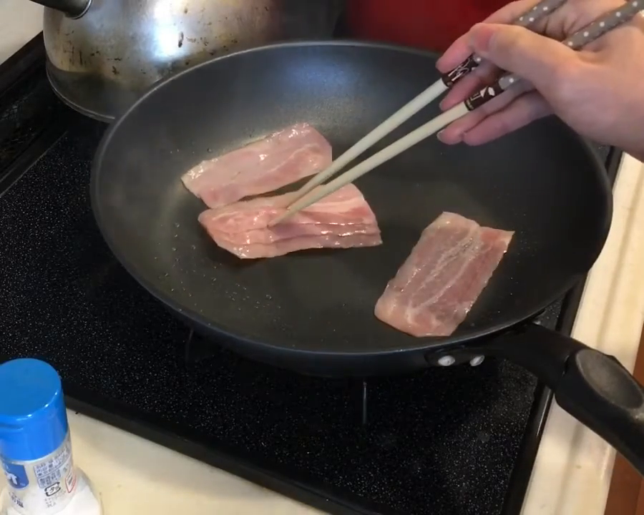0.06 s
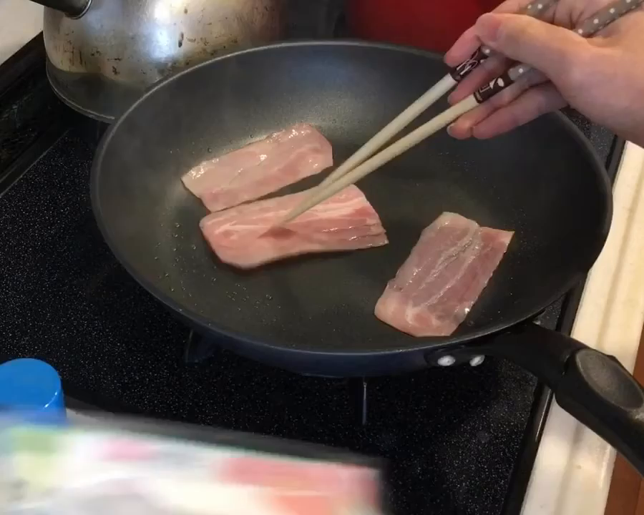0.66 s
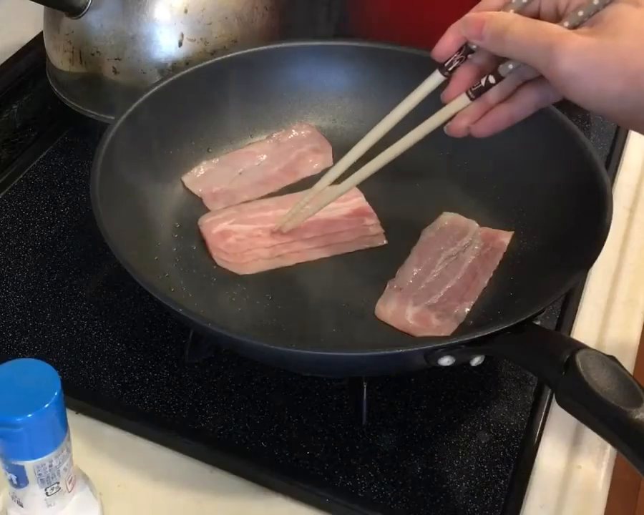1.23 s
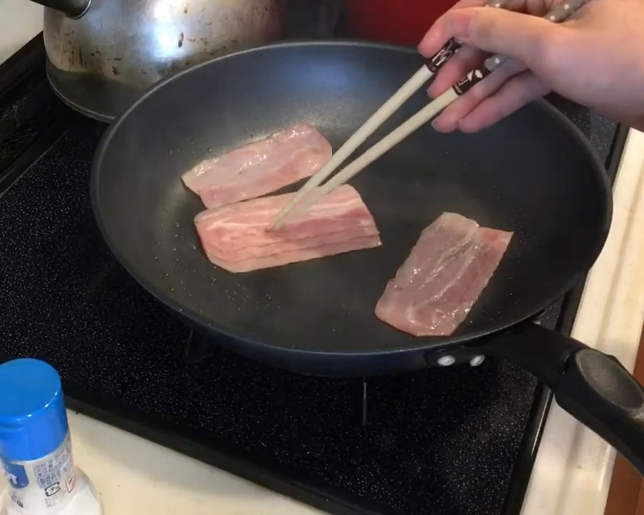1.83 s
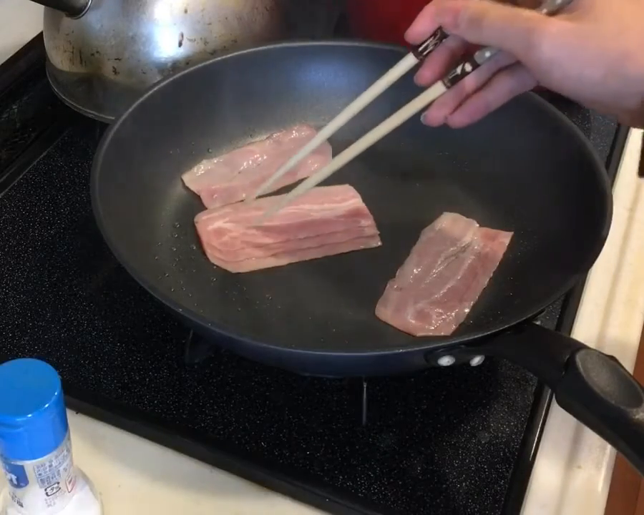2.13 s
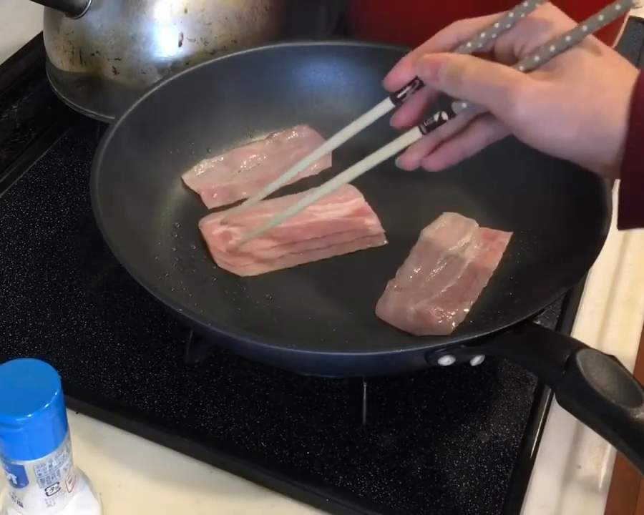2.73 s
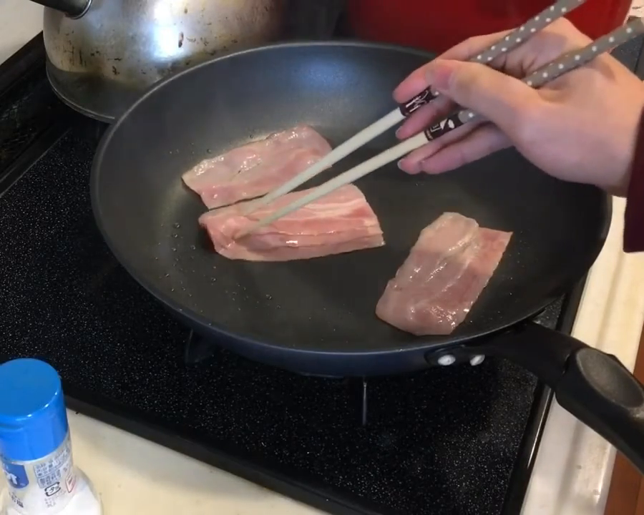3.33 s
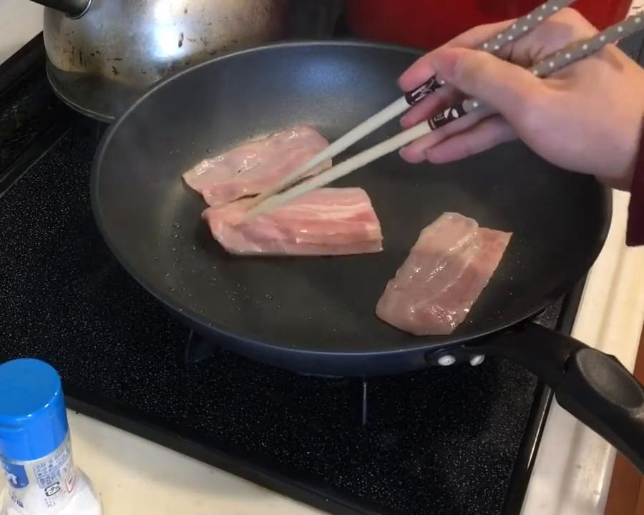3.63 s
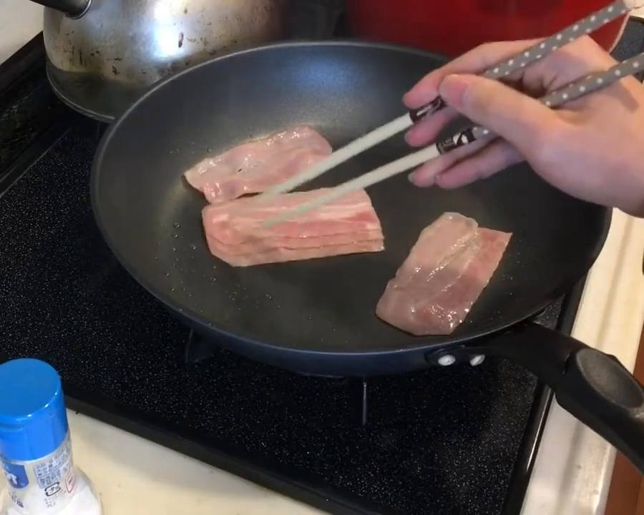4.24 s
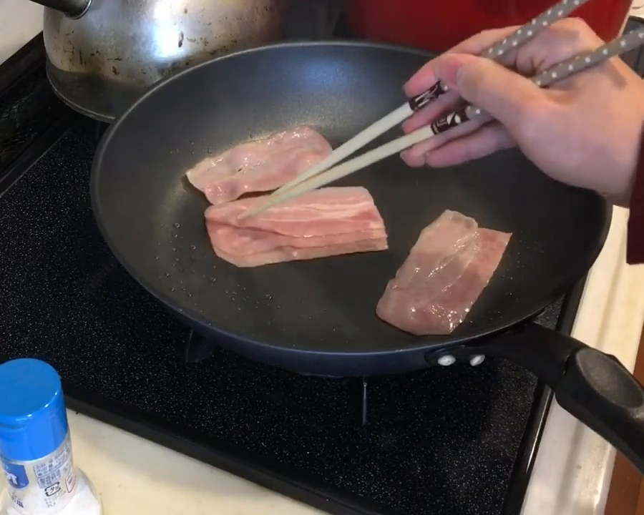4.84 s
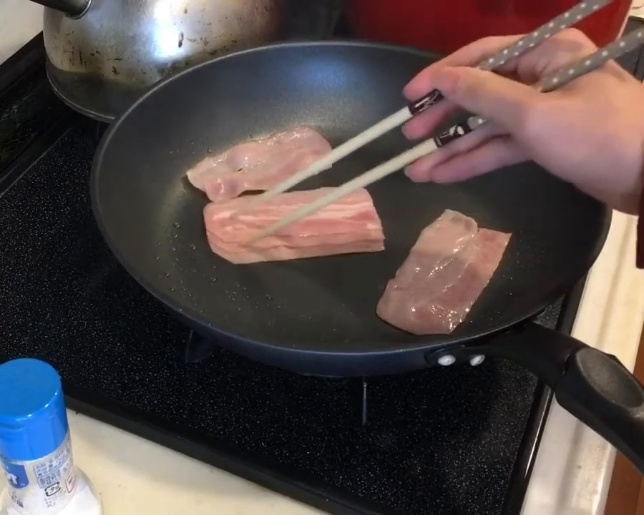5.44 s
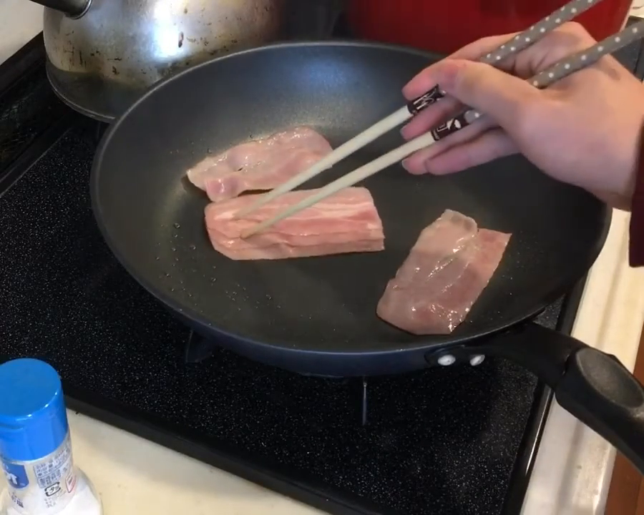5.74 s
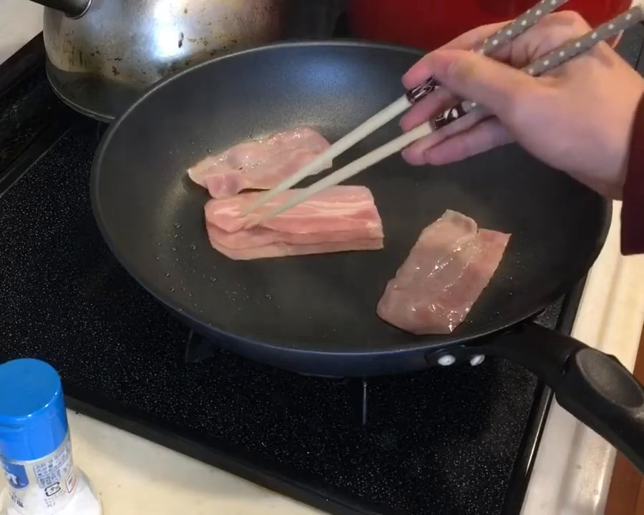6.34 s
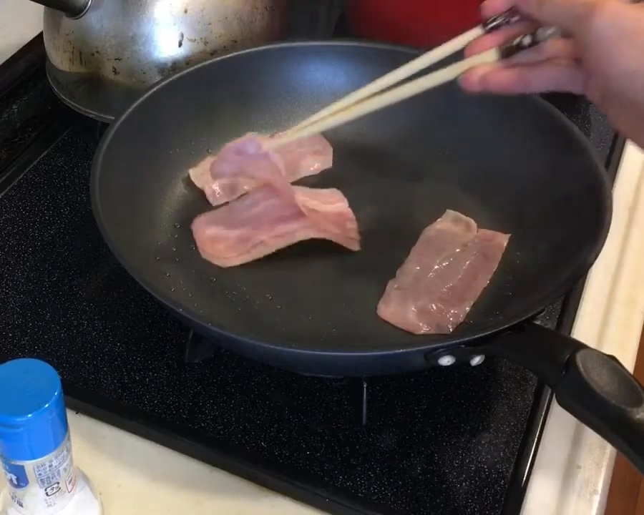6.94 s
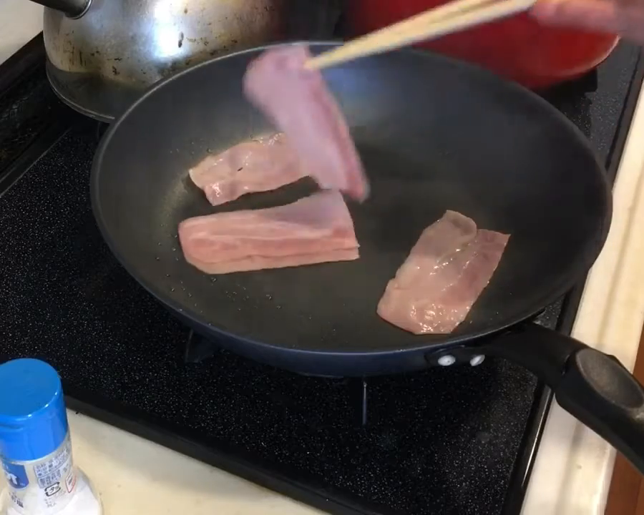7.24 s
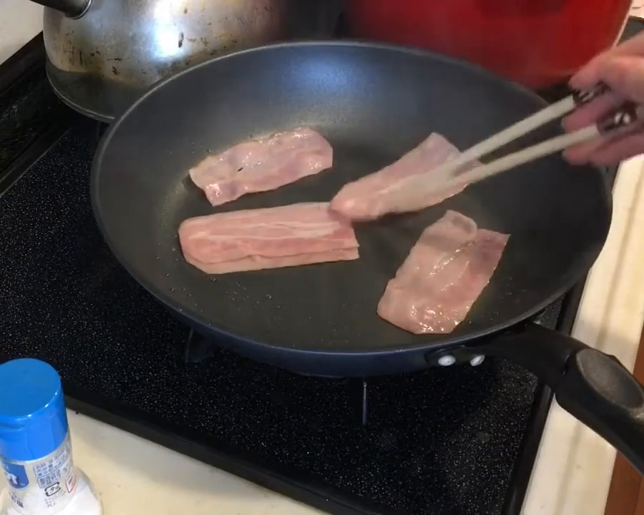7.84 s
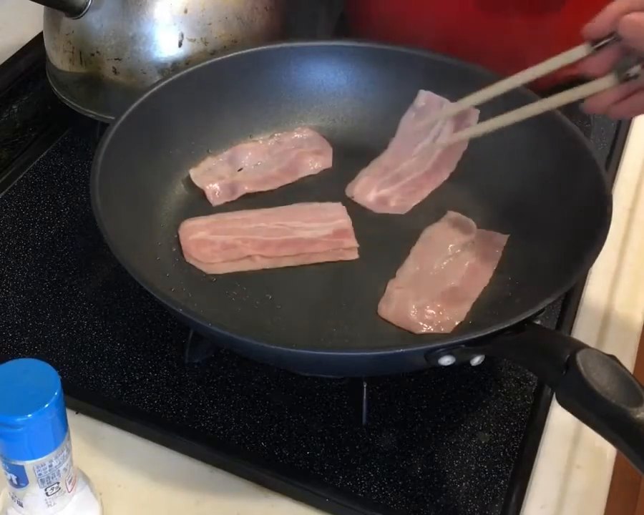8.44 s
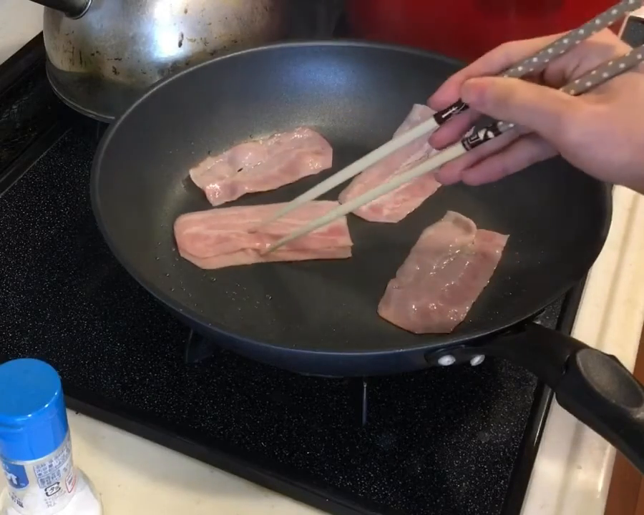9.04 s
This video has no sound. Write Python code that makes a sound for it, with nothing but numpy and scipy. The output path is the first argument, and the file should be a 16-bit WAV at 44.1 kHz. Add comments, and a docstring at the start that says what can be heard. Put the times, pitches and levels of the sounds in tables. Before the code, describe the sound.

Bacon sizzles and crackles in a hot oiled pan, with sharp pops of spitting fat and a few soft chopstick scrapes and bumps.

```python
"""Bacon in a hot oiled pan, close to a mono microphone in a small kitchen. From the start, tiny steam
bubbles fizz and larger ones crackle, ringing the pan over a low room hum. Within the first second, drops
of water begin to pop and spray fat. Chopsticks then move the strips, with soft bumps near 1 and 1.7 s
and a few later scrapes. From about 5 s the pops come thicker, and near 7.8 s a scrape ends in one dull
thump while the frying carries on."""
import sys
import numpy as np
from scipy import signal
from scipy.fft import rfft, irfft, next_fast_len
from scipy.io import wavfile
from scipy.ndimage import map_coordinates

SR = 44100
rng = np.random.default_rng(int(sys.argv[2]) if len(sys.argv) > 2 else 0)


def log_audio(samples):
    """Write samples as a 16-bit WAV file to the path given in sys.argv[1]."""
    # one column per channel
    frames = np.atleast_2d(samples).T
    # limit to full scale, then quantise
    limited = np.clip(frames, -1, 1)
    pcm = np.round(limited * 32767).astype(np.int16)
    wavfile.write(sys.argv[1], SR, pcm)


N = 400869

# How hard the bacon fries. Each row: time in seconds, frying and bubbling strength in relative dB.
HEAT_CURVES = [(0, -33.5, -35.3), (0.75, -34.5, -35.5), (1.4, -34.5, -33.5), (2.05, -35, -35),
               (2.45, -35.5, -34), (3.1, -36, -33), (3.35, -34.5, -33.5), (3.62, -34.5, -33.5),
               (3.76, -35.5, -36.5), (5.35, -36.5, -37), (6.45, -36, -36.5), (6.75, -35, -34.5),
               (7.05, -36, -38), (7.45, -35, -35.8), (7.65, -34, -34.2), (8.3, -34, -35.5),
               (9.09, -34.5, -37.5)]
# Resonances of the pan. Each row: frequency in Hz, width in Hz, lift in dB.
PAN_MODES = [(432, 44, 8), (529, 13, 6), (838, 56, 8.5), (933, 78, 6), (1248, 183, 8), (1479, 25, 5.5),
             (1868, 190, 7.5), (2124, 123, 4.5), (2403, 190, 4.5), (2770, 72, 3.5), (3170, 106, 3.5),
             (3428, 230, 6), (3620, 140, 1.5), (3970, 360, 2.5), (4460, 99, 4.5)]
# Tone colours as heard at the microphone. Each row: frequency in Hz, relative level in dB.
MIST_SPECTRUM = [(3000, -25), (8000, -18), (10400, -6), (11200, 0.5), (13000, 1), (15700, -4)]  # the finest spatter
FIZZ_SPECTRUM = [(300, -30.5), (1500, -12), (4000, -8), (7500, -2), (8600, 0.5), (9900, 0.5), (10450, -6.5),
                 (11100, -2.5), (15700, -22.5)]
BUBBLING_SPECTRUM = [(1500, -21.5), (4000, -10.5), (4900, -5), (5250, 2.5), (5600, 4.5), (6300, 3.5),
                     (7100, -0.5), (7800, -6), (11000, -25)]
SIMMER_SPECTRUM = [(100, -23.5), (250, -6.5), (600, -12), (730, -16), (820, -12), (1200, -4.5), (2300, -2),
                   (2950, -1.5), (3300, 1.5), (4400, 2.5), (5500, -1), (9000, -38)]
BOWL_SPECTRUM = [(300, -4), (1500, -1), (2200, -0.5), (4000, -0.5), (4800, -0.5), (5400, 5), (6700, 5),
                 (7800, 3), (15000, -1)]  # how the shallow pan passes a burst on
HUM_SPECTRUM = [(20, -27), (40, -7), (55, -2), (73, 5), (95, 0), (130, -1.5), (200, -11), (320, -14),
                (700, -11.5), (2000, -60)]
SPRAY_SPECTRUM = [(300, -7), (730, -14.5), (1200, 0), (2900, -3.5), (3500, -0.5), (4800, -1), (5600, 3.5),
                  (6800, 3.5), (8000, 0), (10400, -2), (11500, 2.5), (15500, -20)]
KNOCK_SPECTRUM = [(50, -42), (150, -4), (330, 3), (600, -2), (730, -6), (1000, -0.5), (1400, 2),
                  (2500, -47), (6000, -33)]
# The kitchen's reverberation. Each row: frequency in Hz, seconds to fade by 60 dB.
ROOM_DECAY = [(150, 0.26), (1500, 0.19), (6000, 0.14), (14000, 0.2)]
# The loudest drops bursting in the fat. Each row: start in seconds, energy in dB before the pan colours
# it, pitch in Hz, share thrown as spray from 0 to 1, knock on the pan in dB relative to the pop.
LOUD_DROPS = [(0.7534, -3.5, 6000, 0.9, -16), (0.978, -3.5, 6000, .7, -10), (2.2288, -5, 5200, 0.5, -31),
              (2.5144, -6, 6500, 0.95, -9.5), (2.5651, -12.5, 1570, .4, -8),
              (2.8423, -9.5, 2000, 0.5, -1.5), (3.095, 0, 3730, 0.8, -9.5), (3.242, -5, 7000, 1, -26),
              (3.359, -2.5, 4800, 0.86, -11), (3.6747, 2.5, 3600, 0.97, -14), (4.007, -6, 6200, 0.7, -11),
              (4.7901, -3, 5600, 0.63, -22), (5.0063, -1.5, 4100, 0.56, -15.5),
              (5.1035, -3.5, 2660, 0.66, -15), (5.36, -0.5, 6850, 0.85, -22), (5.4569, -6.5, 6500, 1, -11),
              (5.4731, -3.5, 5900, .3, -11), (5.5411, -3.5, 4500, 0, -23), (5.622, -5.5, 2090, 0.4, -10),
              (5.681, -4, 5350, .4, -17), (5.7282, 1, 4500, 0.5, -36), (6.052, -6.5, 3300, 0.65, -11),
              (6.147, -3, 7500, .75, -19), (6.2465, -8, 5800, 0, -18), (6.2932, 0, 4670, 0.38, -14),
              (6.3486, -2.5, 5330, 0.56, -17), (6.5869, 0.5, 2430, .8, -14), (6.7138, -1, 7100, 0.97, -21),
              (6.7832, -2, 4220, 0.74, -12), (6.869, -2, 6640, 0, -39), (7.0252, -5, 3800, 0.7, -11),
              (7.0511, -2.5, 3900, 0.6, -17), (7.1593, -2, 4400, .9, -10), (7.278, 3.5, 4000, 0.5, -12.5),
              (7.4352, -4.5, 4970, .7, -24), (7.529, -1.5, 6600, 0.26, -32), (7.9615, -3, 6200, .5, -17),
              (8.1001, -4, 6300, 0.1, -30), (8.2421, -6.5, 3300, 0.7, -9), (8.609, -3.5, 5700, 0.35, -32),
              (8.7967, -1, 7100, 0.6, -31), (8.8248, 0.5, 3600, 0.91, -17), (8.98, -6.5, 1800, 0.5, -5.5)]
# Chopsticks tapping and scraping. Each row: start in seconds, energy in dB, centre in Hz,
# width in octaves, seconds to fade by 60 dB.
CHOPSTICK_STROKES = [(.9775, -13.5, 300, 1.2, 0.015), (1.711, -14, 850, 0.34, .09),
                     (1.714, -12.5, 200, 0.48, 0.17), (1.725, -11, 1600, .5, 0.064),
                     (3.095, -7.5, 1380, 0.57, 0.045), (3.675, -2, 1210, 0.52, 0.11),
                     (3.676, -7.5, 400, 0.8, 0.077), (6.7818, -11, 600, 1.3, 0.03),
                     (7.7418, -1.5, 1930, 0.12, 0.031), (7.757, -1, 3300, .25, 0.033),
                     (7.756, -4, 680, 0.74, 0.026), (7.929, -19, 450, 0.57, 0.02)]
# Dull bumps on pan and stove. Each row: start in seconds, level in dB before the onset is softened,
# pitch in Hz, seconds to fade by 60 dB.
STOVE_BUMPS = [(0.979, -42, 130, 0.046), (1.728, -39, 217, .1), (1.768, -37.5, 90, 0.082),
               (7.755, -9.5, 345, 0.012), (7.757, -18.5, 66.6, 0.047), (7.7582, -13.5, 138, 0.02)]


def amp(db):
    """Decibels to gain."""
    return 10 ** (np.asarray(db) / 20)


def unit_rms(x):
    """Scaled to rms 1."""
    return x / np.sqrt(np.mean(x ** 2) + 1e-20)


def unit_energy(x):
    """Scaled to energy 1."""
    return x / np.sqrt(np.sum(x ** 2) + 1e-20)


def along(points, hz):
    """Rows of frequency and value, read on a log frequency axis."""
    freqs, values = np.transpose(points)
    return np.interp(np.log(hz + 1), np.log(freqs + 1), values)


def wobble(rate):
    """A smooth random curve, rate knots a second."""
    return map_coordinates(rng.standard_normal(int(N * rate / SR) + 4), [np.arange(N) * rate / SR])


def add(track, start_s, sound):
    """Mix a short sound into a track."""
    part = track[max(round(start_s * SR), 0):][:len(sound)]
    part += sound[:len(part)]


def minimum_phase(db):
    """The complex spectrum of a causal filter with these gains."""
    cepstrum = irfft(np.log(amp(db)))[:len(db) - 1]
    cepstrum[1:] *= 2
    return np.exp(rfft(cepstrum, 2 * len(cepstrum)))


def colour(x, spectrum, modes=(), size=8192):
    """A sound filtered by a broad spectrum that is lifted at its resonances."""
    hz = np.fft.rfftfreq(size, 1 / SR)
    lift_db = sum(lift / (1 + (2 * (hz - centre) / width) ** 2) for centre, width, lift in modes)
    ring = irfft(minimum_phase(along(spectrum, hz) + lift_db))[:size // 2]
    return signal.fftconvolve(x, unit_energy(ring))[:len(x)]


def around(x, hz, octaves, depth_db):
    """A short sound with only the range around one pitch left strong; energy 1."""
    size = 2 * len(x)
    away = np.log2((np.fft.rfftfreq(size, 1 / SR) + 1) / hz) / octaves
    cut_db = depth_db * away ** 2 / (away ** 2 + depth_db / np.pi)
    return unit_energy(irfft(rfft(x, size) * minimum_phase(-cut_db))[:len(x)])


def ticks(rate, spread_db, size):
    """Random tiny clicks, rate a second, with log-normal sizes."""
    happens = rng.random(size) < rate / SR
    polarity = np.sign(rng.standard_normal(size))
    return happens * polarity * amp(spread_db * np.minimum(rng.standard_normal(size), np.e))


def follow(curve_db, level_db, swing):
    """Gain of a layer that lies at level_db and swings with a control curve."""
    return amp(level_db + swing * (curve_db - curve_db.mean()))


def boil(spectrum, rate, spread_db, flutter_db, surge_db):
    """A swarm of steam bubbles comes in flurries and rings the pan; rms 1."""
    flurries = amp(flutter_db * wobble(130) + surge_db * wobble(22))
    return unit_rms(colour(ticks(rate, spread_db, size=N) * flurries, spectrum, PAN_MODES))


def sizzle():
    """Four sizes of steam bubble boil off under the strips; the bubbling follows its own curve."""
    times, *curves = np.transpose(HEAT_CURVES)
    frying_db, bubbling_db = [np.interp(np.arange(N) / SR, times, curve) for curve in curves]
    mist = boil(MIST_SPECTRUM, rate=11000, spread_db=4, flutter_db=1.1, surge_db=0.93)
    fizz = boil(FIZZ_SPECTRUM, rate=11000, spread_db=5, flutter_db=0.7, surge_db=1)
    bubbling = boil(BUBBLING_SPECTRUM, rate=6000, spread_db=4.5, flutter_db=1.5, surge_db=1.2)
    simmer = boil(SIMMER_SPECTRUM, rate=5000, spread_db=4, flutter_db=1.2, surge_db=0.86)
    return (mist * follow(frying_db, level_db=-38, swing=0.84)
            + fizz * follow(frying_db, level_db=-36, swing=1.33)
            + bubbling * follow(bubbling_db, level_db=-36.5, swing=1.47)
            + simmer * follow(frying_db, level_db=-39, swing=0.6))


def bubble_burst(hz, cycles, t):
    """A bursting bubble: its cavity's ring swells for the given cycles and quickly dies."""
    age = t * hz / cycles
    return unit_energy(age ** 2 * np.exp(-2 * age) * np.sin(2 * np.pi * (hz * t + rng.random())))


def crackle(level_db, growth_db, spread_db, pitch_hz, scatter, count=520):
    """Single bubbles snap dryly in the pan, each at its own pitch, harder as the bacon heats."""
    snaps, t = np.zeros(N), np.arange(SR // 200) / SR
    for progress, size, pitch in zip(rng.random(count), *rng.standard_normal((2, count))):
        hz = np.clip(pitch_hz * np.exp(scatter * pitch), 1500, 14000)
        db = level_db + growth_db * progress + spread_db * min(size, 2)
        add(snaps, progress * N / SR, amp(db) * bubble_burst(hz, cycles=0.5, t=t))
    return colour(snaps, BOWL_SPECTRUM, PAN_MODES)


def room_hum(level_db):
    """The kitchen's steady low rumble, behind the pan."""
    return amp(level_db) * unit_rms(colour(rng.standard_normal(N), HUM_SPECTRUM))


def kitchen_reverb(x):
    """Hob and walls answer 4 ms behind the direct sound; the lows linger longest."""
    hz, t, noise = signal.stft(rng.standard_normal(SR // 3), SR, nperseg=256)
    fade = amp(-60 * t / along(ROOM_DECAY, hz)[:, None])
    _, tail = signal.istft(noise * fade, SR, nperseg=256)
    delayed = np.pad(tail, (SR // 250, 0))
    return signal.fftconvolve(x, unit_energy(delayed))[:len(x)]


def water_pops(drops, cycles, snap_db, spray_t60, knock_t60):
    """A drop flashes to steam: its cavity rings, droplets snap off and patter, the metal is knocked."""
    bursts, sprays, knocks = np.zeros((3, N))
    t = np.arange(SR // 10) / SR
    for start, db, hz, share, knock_db in drops:
        snap = amp(snap_db) * unit_energy(rng.standard_normal(len(t)) * amp(-60 * t / 0.0015))
        cavity = bubble_burst(hz, cycles, t)
        add(bursts, start - 0.0001, amp(db) * (np.sqrt(1 - share) * cavity + np.sqrt(share) * snap))
        patter = ticks(rate=9000, spread_db=1.9, size=len(t)) * amp(-60 * t / spray_t60)
        # The less a drop sprays, the closer its droplets keep to its pitch.
        spray = around(patter, hz, octaves=0.6, depth_db=2.5 + 15 * (1 - share))
        add(sprays, start + 0.0006, amp(db) * np.sqrt(share) * spray)
        knock = unit_energy(rng.standard_normal(len(t)) * amp(-60 * t / knock_t60))
        add(knocks, start, amp(db + knock_db) * knock)
    return (colour(bursts, BOWL_SPECTRUM, PAN_MODES)
            + colour(sprays, SPRAY_SPECTRUM, PAN_MODES)
            + colour(knocks, KNOCK_SPECTRUM, PAN_MODES))


def lesser_drops(level_db, spread_db, pitch_hz, scatter, share, knock_db, strays=10):
    """Rows like LOUD_DROPS: most bunch around the loud ones, a few stray once the fat is hot."""
    bunch_chance, lag_s, spread_s, hot_from_s = 0.6, 0.016, 0.03, 4.8
    draws = rng.random((len(LOUD_DROPS), 2))
    bunched = [start + lag_s + spread_s * (2 * offset - 1)
               for (start, *_), (luck, offset) in zip(LOUD_DROPS, draws) if luck < bunch_chance]
    starts = bunched + list(rng.uniform(hot_from_s, N / SR, strays))
    return [(start, level_db + spread_db * size, pitch_hz * np.exp(scatter * pitch), share, knock_db)
            for start, (size, pitch) in zip(starts, rng.uniform(-1.04, 1, (len(starts), 2)))]


def chopstick_scrapes(slips_per_s):
    """Wood catches and slips on the pan in a quickly fading run of tiny ticks."""
    scrapes, t = np.zeros(N), np.arange(SR // 5) / SR
    for start, db, hz, octaves, t60 in CHOPSTICK_STROKES:
        slips = ticks(slips_per_s, spread_db=2.9, size=len(t)) * amp(-60 * t / t60)
        add(scrapes, start, amp(db) * around(slips, hz, octaves, depth_db=56))
    return scrapes


def stove_bumps(attack_s):
    """Heavily damped contacts on pan and stove while the strips are moved."""
    bumps, t = np.zeros(N), np.arange(SR // 4) / SR
    onset = 1 - np.exp(-t / attack_s)
    for start, db, hz, t60 in STOVE_BUMPS:
        add(bumps, start, amp(db - 60 * t / t60) * np.sin(2 * np.pi * hz * t) * onset)
    return bumps


def scene():
    """The pan up close with the kitchen well behind it, the same in both channels."""
    pan = sizzle() + crackle(level_db=-21, growth_db=2.5, spread_db=4.5, pitch_hz=5800, scatter=0.51)
    pan += chopstick_scrapes(slips_per_s=7000)
    lesser = lesser_drops(level_db=-8.5, spread_db=3, pitch_hz=5400, scatter=0.45,
                          share=0.48, knock_db=-16.5)
    pan += water_pops(LOUD_DROPS + lesser, cycles=1.4, snap_db=-3.5, spray_t60=0.062, knock_t60=0.022)
    room = amp(-11.5) * kitchen_reverb(pan) + room_hum(level_db=-56.5)
    mono = pan + room + stove_bumps(attack_s=0.001)
    return np.array([mono, mono])


def record(dry):
    """The microphone sheds the deepest bass and keeps nothing above its band limit."""
    low_cut_hz, top_hz = 45, 15780
    thinned = signal.sosfilt(signal.butter(3, low_cut_hz, "high", fs=SR, output="sos"), dry)
    size = next_fast_len(N + SR // 4)
    in_band = np.fft.rfftfreq(size, 1 / SR) < top_hz
    return irfft(rfft(thinned, size) * in_band, size)[:, :N]


dry = scene()
out = record(dry)
log_audio(out)
```